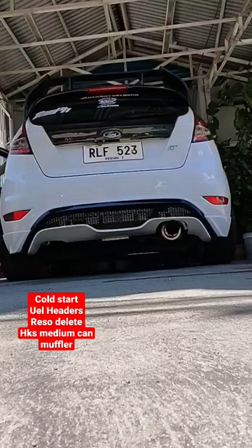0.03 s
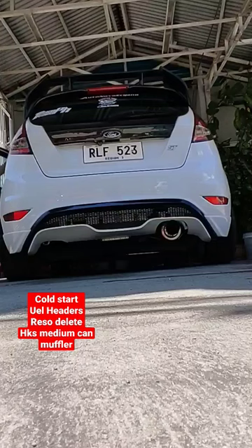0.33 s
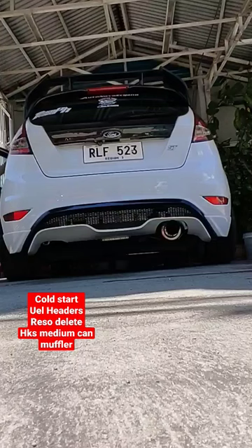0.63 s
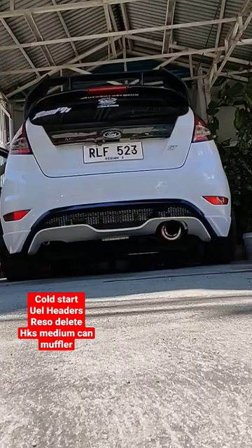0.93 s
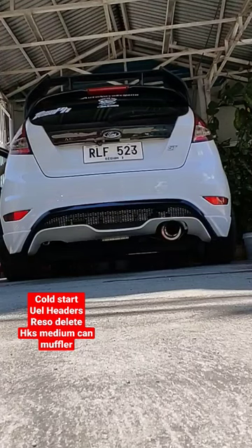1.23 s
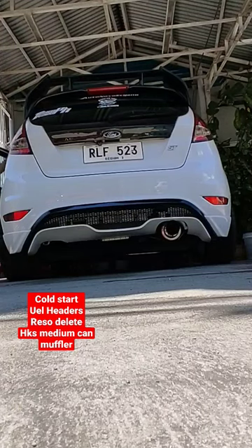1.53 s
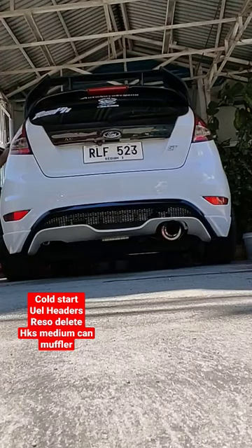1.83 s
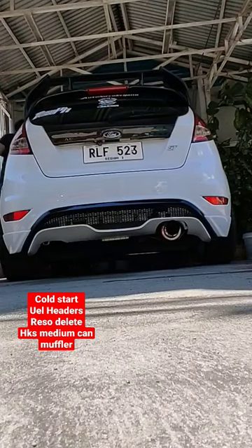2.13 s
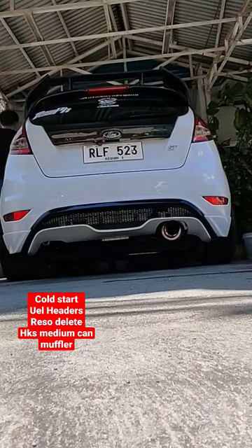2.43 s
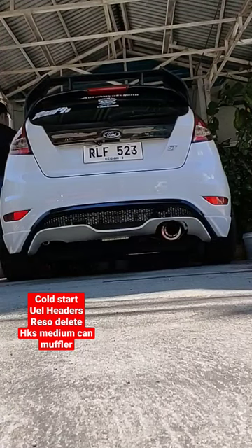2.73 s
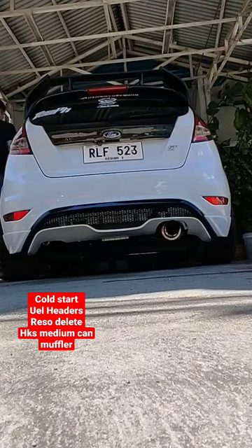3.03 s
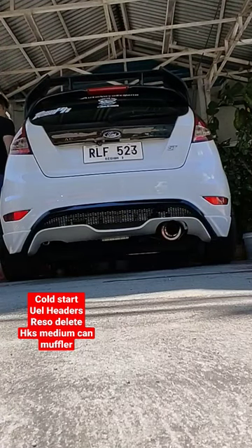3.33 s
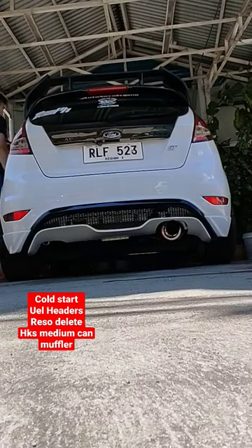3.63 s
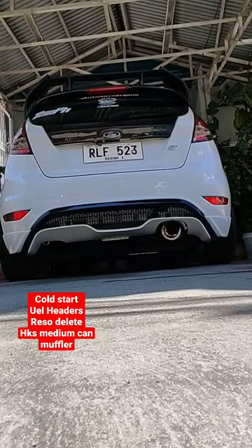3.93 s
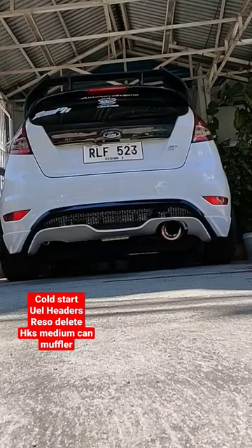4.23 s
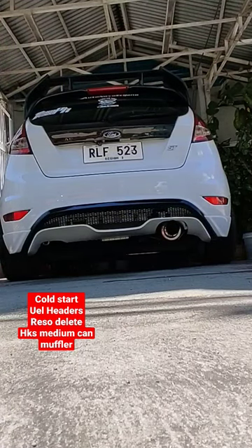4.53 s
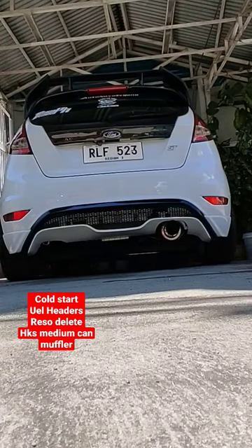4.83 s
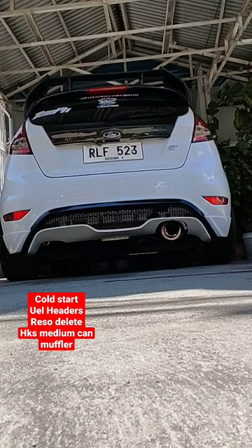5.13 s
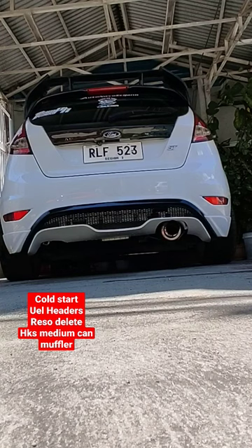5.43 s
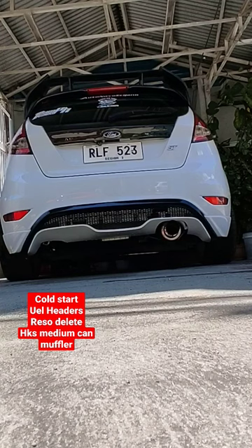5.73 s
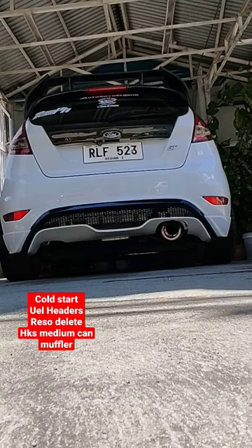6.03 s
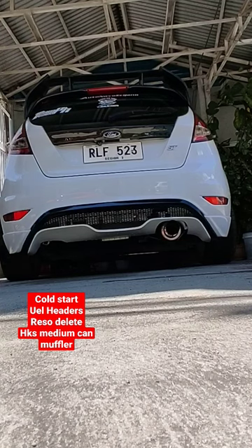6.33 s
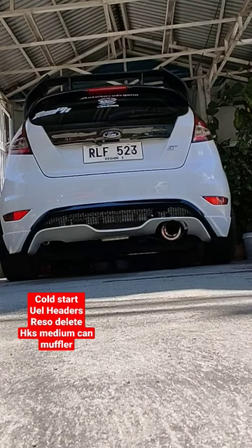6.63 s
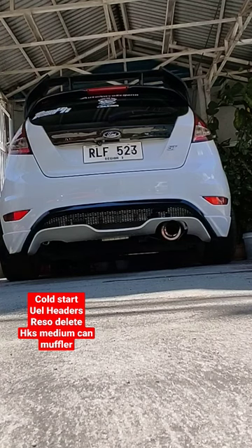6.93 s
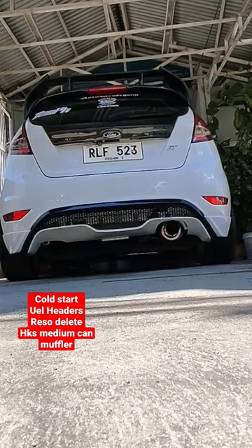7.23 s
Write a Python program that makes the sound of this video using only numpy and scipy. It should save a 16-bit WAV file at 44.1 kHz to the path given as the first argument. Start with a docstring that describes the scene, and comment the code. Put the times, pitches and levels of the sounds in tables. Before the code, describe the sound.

A four-cylinder car cold starts with a clack and short grind, then idles with a loud, throbbing low exhaust rumble.

```python
"""Cold start of a four-cylinder car under a tin carport roof, stereo microphones low behind its sports
exhaust. Traffic murmurs far off. The solenoid clacks, the starter grinds against the flywheel, and at
1.2 s the engine catches with two thumps and a few barks. It settles into a lumpy fast idle: headers of
unequal length give each cylinder its own puff, and the pipe rings with them. The engine bay hisses and
ticks; at 4.4 s a shoe scuffs once on the concrete."""
import sys
import numpy as np
from scipy import signal
from scipy.fft import rfft, irfft, next_fast_len
from scipy.io import wavfile
from scipy.ndimage import uniform_filter1d, minimum_filter1d

SR = 44100
rng = np.random.default_rng(int(sys.argv[2]) if len(sys.argv) > 2 else 0)


def put_to_file(sound):
    """Save the sound as 16-bit audio at rate SR, in the file named by the first command-line argument."""
    columns = np.atleast_2d(sound).T  # one column per channel
    safe = np.clip(columns, -1, 1)
    whole_steps = np.round(safe * 32767)
    wavfile.write(sys.argv[1], SR, whole_steps.astype(np.int16))


N = 321489
T = np.arange(N) / SR
SIZE = next_fast_len(N + SR)
HZ = np.arange(SIZE // 2 + 1) * SR / SIZE + 1e-6
FLARE_S, FLARE_END_S = 1.26, 1.6  # the revs flare and the firings bark between these times


def undb(db):
    """Decibels to gain."""
    return 10 ** (np.asarray(db) / 20)


def unit(x):
    """Scale to rms 1."""
    return x / np.sqrt(np.mean(x ** 2))


def curve(rows):
    """Join (t/s, value) rows by straight lines."""
    return np.interp(T, *np.transpose(rows))


def ramp(start_s, length_s):
    """A straight rise from 0 to 1."""
    return np.clip((T - start_s) / length_s, 0, 1)


def filtered(x, response):
    """Apply a frequency response."""
    return irfft(rfft(x, SIZE) * response, SIZE)[..., :N]


def colour(points):
    """Response through (f/Hz, level/dB) points."""
    hz, db = np.transpose(points)
    return undb(np.interp(np.log(HZ), np.log(hz), db))


def low_cut(hz):
    """Response that falls by 6 dB an octave below hz."""
    return HZ / np.hypot(HZ, hz)


def resonances(modes, damping=0.021):
    """Response of a chain of ringing peaks and notches; wall losses keep every ring short."""
    response = 1
    for hz, width, db in modes:
        spring, lift, wall_loss = hz ** 2 - HZ ** 2, undb(db / 2), hz * damping
        notch = spring + 1j * HZ * np.hypot(width * lift, wall_loss)
        peak = spring + 1j * HZ * np.hypot(width / lift, wall_loss)
        response = response * notch / peak
    return response


def strikes(times, sizes):
    """Single-sample pulses."""
    return np.bincount(np.clip(np.asarray(times) * SR, 0, N).astype(int), sizes, N + 1)[:N]


def tail(x, seconds):
    """Every pulse jumps up and dies away exponentially."""
    return signal.lfilter([1], [1, -np.exp(-1 / (seconds * SR))], x)


def soften(x, hz):
    """One-pole low-pass."""
    keep = np.exp(-2 * np.pi * hz / SR)
    return signal.lfilter([1 - keep], [1, -keep], x)


def air(alike_hz):
    """Noise at the two microphones, alike in the bass and unrelated in the treble."""
    mid, side = rng.standard_normal((2, N))
    side = filtered(side, low_cut(alike_hz))
    return np.array([mid + side, mid - side])


def panned(x, balance):
    """Tilt each band towards the left or right microphone."""
    lean = np.sqrt(colour(balance))
    return filtered(x, np.array([lean, 1 / lean]))


# crank speed: the flare as it catches, a sag, then the fast idle (t/s, speed/rpm)
CRANK_RPM = [(1.186, 480), (1.313, 1234), (1.4, 1231), (1.745, 1066), (2.337, 1078.3), (2.949, 1033),
             (3.643, 1166.5), (4.359, 1178.7), (5.198, 1142.1), (5.905, 1162.5), (6.414, 1148.2),
             (7.29, 1162.3)]
def cycles(zero_s=5.642):
    """Count of four-stroke cycles, two turns of the crank each, passing zero at zero_s."""
    count = np.cumsum(curve(CRANK_RPM)) / (2 * 60 * SR)
    return count - np.interp(zero_s, T, count)


def firing_times(angle):
    """The moments when the crank passes this angle of its 720-degree cycle."""
    count = cycles()
    whole_cycles = np.arange(np.ceil(count[0]) + 1, count[-1] + 1)
    return np.interp(whole_cycles + angle / 720, count, T, right=N / SR)


# strength of the burn (t/s, level/dB)
BURN_EFFORT = [(1.5, -3.5), (1.92, 2.2), (2.6, -2.5), (2.92, -2.5), (3.5, 1.6), (3.9, 0.64), (6.5, 0.93)]
def effort_db():
    """How hard the engine burns; drives the rumble, its edge, the rasp and the intake hiss."""
    return curve(BURN_EFFORT)


# load on the engine (t/s, state: 0 light load, 1 warm-up, 2 fast idle)
RUNNING_STATE = [(3.15, 0.11), (3.55, 1.08), (4.76, 0.99), (5.05, 2)]
def running_state():
    """The engine glides from one state to the next."""
    return curve(RUNNING_STATE)


# traffic as it reaches the yard (f/Hz, level/dB)
TRAFFIC_SPECTRUM = [(15, -21.5), (25, 0), (161, -15.5), (203, -5), (323, -12), (386, -19), (463, -17),
                    (906, -32.5), (2970, -38), (4990, -47), (12000, -50), (15600, -89), (22000, -120)]
def distant_traffic(db=-49.5):
    """Traffic murmurs far beyond the carport."""
    return unit(filtered(air(400), colour(TRAFFIC_SPECTRUM))) * undb(db) * ramp(0.14, .012)


def carport(x, t60_s=0.51, wet_db=-14, bass_hz=220):
    """Roof and walls scatter the sound, differently to each microphone; long bass waves escape."""
    length = SR // 2
    echoes = rng.standard_normal((2, length)) * undb(-60 * T[:length] / t60_s)
    echoes *= ramp(0.0042, 0.004)[:length]
    echoes /= np.sqrt(np.sum(echoes ** 2, axis=1, keepdims=True))
    return undb(wet_db) * filtered(x, rfft(echoes, SIZE) * low_cut(bass_hz))


def side_wall(x, echo_db=-15, lag_s=0.0108, bass_hz=170):
    """An echo from the side wall meets the two microphones with opposite sign."""
    echo = filtered(x.mean(axis=0), np.exp(-2j * np.pi * HZ * lag_s) * low_cut(bass_hz) ** 2)
    return undb(echo_db) * np.array([echo, -echo])


# sole on concrete (f/Hz, level/dB)
SHOE_SPECTRUM = [(500, 2), (1000, -6), (2500, -10.5), (4000, -19), (7500, -26.5), (13000, -35)]
def shoe_scuff(at_s=4.372, width_s=0.024, db=-26.5):
    """A shoe scrapes over the gritty floor."""
    grains = np.exp(.3 * unit(soften(rng.standard_normal(N), 300)))
    scrape = unit(filtered(air(1500) * grains, colour(SHOE_SPECTRUM)))
    return scrape * undb(db) / np.cosh(np.clip((T - at_s) / width_s, -20, 20))


# chain and pulley tones (multiple of crank speed, level/dB)
CHAIN_TONES = [(75, -61.5), (129, -63.5), (137, -65), (330, -70.5)]
def chain_whine():
    """Thin wavering tones ride on the crank speed."""
    turns = 2 * cycles()
    tones = 0
    for order, db in CHAIN_TONES:
        waver = unit(soften(soften(air(2.4), 12), 12))
        tones = tones + undb(db) * waver * np.sin(2 * np.pi * order * turns)
    return tones * ramp(1.0, .3)


# modes of the starter and engine metal (f/Hz, width/Hz, level/dB)
METAL_MODES = [(381, 16, 0.5), (907, 16, -1), (1480, 13, 0), (2500, 72, -1.5), (2670, 68, 11.5),
               (5970, 330, 4.5), (7520, 360, 7.5)]
def metal_ring():
    """Response of the ringing metal at the far end of the car."""
    return resonances(METAL_MODES)


# belt and intake hiss (f/Hz, level/dB)
BAY_SPECTRUM = [(590, -29), (1000, 1), (1080, -10), (1180, -3.5), (1720, -6.5), (3050, -3), (3440, -7),
                (3760, -5.5), (4020, -12), (4540, -13.5), (7540, -15), (8240, -22.5), (8900, -18),
                (9720, -21), (14000, -23.5)]
# the bay at the microphones (f/Hz, left minus right/dB)
BAY_BALANCE = [(60, 0), (110, 3), (200, -3), (380, -4.5), (690, 1), (1280, 0), (2350, -1.5), (4340, -5),
               (8000, -7.5), (14700, 6.5)]
def engine_bay(hiss_db=-45, effort_power=0.18, tick_depth=0.25, tick_s=0.018, shut_db=-4, eased_db=-3):
    """Belts and intake hiss as the throttle opens and eases; valves and injectors tick twice a firing."""
    times = np.concatenate([firing_times(angle) for angle in np.arange(0, 720, 90)])
    ticks = tail(strikes(times, rng.uniform(0, 3, len(times))), tick_s)
    ticking_air = air(1200) * (1 + tick_depth * ticks)
    hiss = unit(filtered(ticking_air, colour(BAY_SPECTRUM) * np.sqrt(metal_ring())))
    throttle_db = shut_db * (1 - ramp(1.64, 0.19)) + eased_db * ramp(3.9, 0.89)
    level_db = hiss_db + throttle_db + effort_power * effort_db()
    return panned(hiss * undb(level_db) * ramp(1.3, 0.089), BAY_BALANCE)


# solenoid and pinion clack (f/Hz, level/dB)
CLACK_SPECTRUM = [(59, -44), (100, -13), (211, 5), (481, 4.5), (592, 1.5), (1440, 1.5), (1810, -2),
                  (2730, 4.5), (4310, -9), (6250, -8.5), (14000, -21)]
# solenoid and starter at the microphones (f/Hz, left minus right/dB)
STARTER_BALANCE = [(60, 19), (110, 12), (200, -4), (380, -2), (690, 0.5), (1280, -2), (2350, -1.5),
                   (4340, -6), (8000, -8), (14700, 3)]
def solenoid(decay_s=0.057, attack_hz=60):
    """The solenoid pulls in and the pinion slams into the flywheel."""
    blows = soften(tail(strikes([.627, .649], undb([-34, -25.5])), decay_s), attack_hz)
    return panned(unit(filtered(air(1100), colour(CLACK_SPECTRUM))) * blows, STARTER_BALANCE)


# grinding gear teeth (f/Hz, level/dB)
GRIND_SPECTRUM = [(120, -45), (200, -26), (296, -6), (323, -14), (366, 6), (513, -19), (551, 2), (635, -11),
                  (844, -2.5), (1570, -8), (2680, -4.5), (4410, -13), (7510, -12), (8360, -18.5),
                  (14000, -20.5)]
# compressions and first burns that strain the starter (t/s, extra level/dB)
STARTER_STRAIN = [(.8, 2), (.97, 3), (1.111, 5.5), (1.165, 7.5), (1.214, 9.5)]
# pitch of the starter motor (t/s, f/Hz)
MOTOR_WHINE = [(.7, 4900), (.8, 5600), (.88, 6300), (1.0, 6400), (1.1, 6200), (1.22, 6400), (1.7, 5900)]
def starter(engage_s=0.725, release_s=1.232, level_db=-36.5, climb_db=2.5, mesh_hz=360, chug_s=0.019,
            whine_db=-11, coast_db=-10):
    """Gear teeth grind on the flywheel, harder on each compression; the motor whines up to speed."""
    teeth = 1 + 0.25 * np.cos(2 * np.pi * mesh_hz * T)
    rattle = np.exp(0.15 * unit(soften(rng.standard_normal(N), 53)))
    grind = unit(filtered(air(1300) * teeth * rattle, colour(GRIND_SPECTRUM) * metal_ring()))
    strain_db = sum(db * np.exp(-((T - at_s) / chug_s) ** 2) for at_s, db in STARTER_STRAIN)
    grind = grind + soften(grind, 4500) * (undb(strain_db) - 1)
    waver = unit(soften(soften(air(50), 220), 220))
    whine = undb(whine_db) * waver * np.cos(2 * np.pi * np.cumsum(curve(MOTOR_WHINE)) / SR)
    running = undb(level_db + climb_db * ramp(engage_s, release_s - engage_s)) * ramp(engage_s, 0.053)
    # the motor coasts on after the pinion lets go
    meshed = 1 - ramp(release_s, 0.091)
    coasting = undb(coast_db * ramp(release_s, 0.17)) * (1 - ramp(release_s, 0.71))
    return panned(running * (grind * meshed + whine * coasting), STARTER_BALANCE)


# pipe and muffler resonances (f/Hz, width/Hz, level/dB)
PIPE_MODES = [(42.5, 107, 41), (48.9, 20.3, -25.5), (83.74, 6.24, 18.5), (105.6, 50.7, 16),
              (139.3, 7.7, -16.5), (178.5, 7.14, 15.5), (233.16, 13.2, 18), (282.8, 74, -10.5),
              (282.8, 7.8, 20), (332.2, 56.5, 18.5), (369.4, 6.2, 17.5), (409.5, 68.5, 11), (470, 11, -2),
              (553, 17, 20.5), (686, 3.6, 14), (799, 30, 12)]
def tailpipe(puffs, low_hz=121, high_hz=267, damping=0.021):
    """The pipe rings; its mouth radiates little deep bass and the muffler takes the top."""
    s = 1j * HZ
    mouth = (s / (s + low_hz)) ** 3
    muffler = 1 / (1 + np.sqrt(2) * s / high_hz + (s / high_hz) ** 2)
    return filtered(puffs, resonances(PIPE_MODES, damping) * mouth * muffler)


# unfired air pushed out while cranking (t/s, level/dB)
AIR_PUFFS = [(0.676, -30), (.782, -20.5), (.803, -24), (0.96, -18), (1.006, -36), (1.099, -16)]
def cranking(puff_db=38, shake_db=-43):
    """Pistons pump soft puffs down the pipe while the engine shakes on its mounts."""
    times, db = np.transpose(AIR_PUFFS)
    puffs = soften(soften(strikes(times, undb(db)), 32), 68)
    mounts = colour([(12, -20), (27, 0), (48, -2), (90, 2), (200, -17), (600, -50)])
    shake = unit(filtered(air(600), mounts)) * ramp(0.66, 0.043) * (1 - ramp(1.6, .2))
    return undb(puff_db) * tailpipe(puffs) + undb(shake_db) * shake


# the burns on which the engine catches (t/s, level/dB, sharpness/Hz)
SLOW_BURNS = [(1.186, 28.5, 2.67), (1.232, 12, 10.8)]
def first_burns(burn_db=36.5):
    """The first two cylinders burn slowly: round thumps without an edge."""
    puffs = 0
    for at_s, db, sharp_hz in SLOW_BURNS:
        puffs = puffs + soften(soften(strikes([at_s], [undb(db)]), sharp_hz), 20 * sharp_hz)
    return undb(burn_db) * tailpipe(puffs, high_hz=260, damping=0.042)


def snap(at_s=1.372, db=-42, decay_s=0.004):
    """One bright snap at the top of the flare."""
    return np.diff(air(4000), prepend=0) * tail(strikes([at_s], [undb(db)]), decay_s)


# barks, one row per cylinder (crank angle/deg, crack level/dB, fading/(dB per s))
BARKS = [(2, -2, 17.5), (178, -3, 58), (360.5, -3, 40), (533.6, -3, 140)]
# a crack of gas at the pipe mouth (f/Hz, level/dB)
CRACK_SPECTRUM = [(300, 4), (600, 9), (950, -8), (1500, -20), (3000, -29), (6000, -38), (13000, -41.5)]
def flare(bark_db=22, sharp_hz=650, emptied_db=-7, front_db=19, hiss_db=3, split_hz=1100, decay_s=0.0057):
    """Firings bark with a steep front and a hiss, hardest at first, on a manifold full of air."""
    puffs = cracks = 0
    for angle, db, fading in BARKS:
        times = firing_times(angle)
        times = times[(times > FLARE_S) & (times < FLARE_END_S)]
        age = times - times[0]
        puffs = puffs + strikes(times, undb(emptied_db * (age > 0) - fading * age))
        cracks = cracks + strikes(times, undb(db - fading * age))
    front = undb(front_db) * soften(cracks, split_hz)
    hiss = undb(hiss_db) * filtered(air(3600) * tail(cracks, decay_s), low_cut(split_hz))
    bark = tailpipe(soften(puffs, sharp_hz), high_hz=328, damping=0.091)  # rushing gas damps the pipe
    return undb(bark_db) * bark + filtered(front + hiss, colour(CRACK_SPECTRUM))


# gas noise, one row per running state (rasp level/dB, spit level/dB)
GAS_LEVELS = [(-41.5, -58), (-43, -47), (-38, -43)]
def gas_db(column):
    """Level of the rasp (column 0) or the spit (column 1), gliding with the running state."""
    return np.interp(running_state(), np.arange(len(GAS_LEVELS)), np.transpose(GAS_LEVELS)[column])


def spit(angle=8, scatter_db=3.0, decay_s=0.013, low_hz=900):
    """Under load one cylinder spits a crack of gas once a cycle."""
    times = firing_times(angle)
    bursts = tail(strikes(times, undb(scatter_db * rng.standard_normal(len(times)))), decay_s)
    gas = unit(filtered(air(4000) * bursts, colour(CRACK_SPECTRUM) * low_cut(low_hz)))
    return gas * undb(gas_db(column=1)) * ramp(FLARE_END_S, 0.089)


# gas leaving the pipe, one row per cylinder (crank angle/deg, level/dB)
GAS_GUSTS = [(4, -4), (186, 0), (396, 4.5), (566, -3)]
# rasp at the pipe mouth (f/Hz, level/dB)
RASP_SPECTRUM = [(250, -21), (480, 1.5), (660, 7.5), (720, -11), (820, -6), (1100, -31), (2000, -34),
                 (5000, -37.5)]
def gas_rasp(effort_power=1.77, decay_s=0.021, cold_db=12, cold_s=0.63):
    """Gas tears out after each firing, growing steeply with effort, harshest just after the start."""
    bursts = 0
    for angle, db in GAS_GUSTS:
        times = firing_times(angle)
        bursts = bursts + strikes(times, undb(db + rng.uniform(-1.7, 1.5, len(times))))
    gas = unit(filtered(air(1800) * tail(bursts, decay_s), colour(RASP_SPECTRUM)))
    level_db = gas_db(column=0) + effort_power * effort_db() + cold_db * (1 - ramp(1.37, cold_s))
    return gas * undb(level_db) * ramp(FLARE_S, 0.2)


def cylinder_puffs(cylinders, scatter_db=1.04, jitter_s=.00006):
    """Each cylinder puffs down the pipe once a cycle; its own header sends back an echo."""
    puffs = 0
    for angle, db, sharp_hz, echo_ms, echo_share in cylinders:
        times = firing_times(angle)
        lateness, unevenness = rng.standard_normal((len(times), 2)).T
        times = times + jitter_s * lateness
        sizes = undb(db + scatter_db * unevenness)
        echo = echo_share * strikes(times + echo_ms / 1000, sizes)
        puffs = puffs + soften(strikes(times, sizes) + echo, sharp_hz)
    return unit(tailpipe(puffs))


# firing pattern of each running state, one row per cylinder
# (crank angle/deg, level/dB, sharpness/Hz, header echo/ms, echo share)
LIGHT_LOAD_FIRING = [(-4, -9.5, 350, 10.62, -0.33), (139.5, -6.5, 297, 7.87, 0.65),
                     (343.5, 2, 98, 7.43, 0.25), (522, 8.5, 41.8, 15.62, 0.77)]
WARM_UP_FIRING = [(3.6, 5, 324, 11.55, -0.32), (175.3, -4.5, 480, 12.17, 0.53),
                  (375.8, 10.5, 81.5, 7.74, -0.16), (563.4, 1, 350, 13.22, -0.23)]
FAST_IDLE_FIRING = [(-1.5, -4.5, 450, 3.22, -0.27), (177, -2.5, 390, 5.82, 0.23),
                    (365, 13, 35.7, 14.62, -0.29), (548, 4.56, 127, 14.06, 0.57)]
def exhaust(rumble_db=-11.5, edge_hz=480, edge_per_effort=0.69):
    """The firing pattern shifts with the warm-up load; with less effort the note is softer and duller."""
    state, effort = running_state(), effort_db()
    rumble = 0
    for index, cylinders in enumerate([LIGHT_LOAD_FIRING, WARM_UP_FIRING, FAST_IDLE_FIRING]):
        share = np.clip(1 - abs(state - index), 0, 1)
        rumble = rumble + share * cylinder_puffs(cylinders)
    edge = filtered(rumble, HZ ** 4 / (HZ ** 4 + edge_hz ** 4))
    rumble = rumble + edge * (undb(edge_per_effort * effort) - 1)
    # loudness is set over several cycles, so the lope within a cycle stays
    power = uniform_filter1d(uniform_filter1d(rumble ** 2, size=9600), size=9600)
    return rumble / np.sqrt(power + 1e-9) * undb(rumble_db + effort) * ramp(1.27, 0.25)


def scene(left_lag_s=4e-5):
    """Low behind the car: the tailpipe is a little to the right and reaches the left microphone later."""
    pipe = cranking() + first_burns() + flare() + snap() + exhaust() + gas_rasp() + spit()
    pipe = filtered(pipe, np.exp(-2j * np.pi * HZ * np.array([[left_lag_s], [0]])))
    near = pipe + side_wall(pipe) + starter() + solenoid() + engine_bay() + chain_whine() + shoe_scuff()
    return near + carport(near) + distant_traffic()


def record(dry, ceiling=0.9, top_hz=14350):
    """After the microphones a fast limiter holds the peaks and a steep low-pass cuts the top."""
    allowed_gain = np.minimum(1, ceiling / (abs(dry).max(axis=0) + 1e-9))
    gain = uniform_filter1d(minimum_filter1d(allowed_gain, size=441), size=441)  # 10 ms windows
    return signal.sosfilt(signal.ellip(10, .2, 80, top_hz, fs=SR, output="sos"), dry * gain)


dry = scene()
out = record(dry)
put_to_file(out)
```